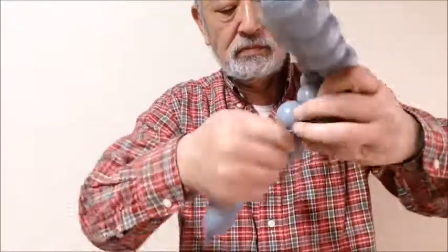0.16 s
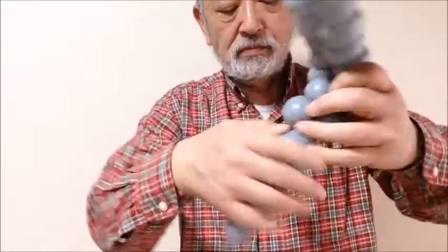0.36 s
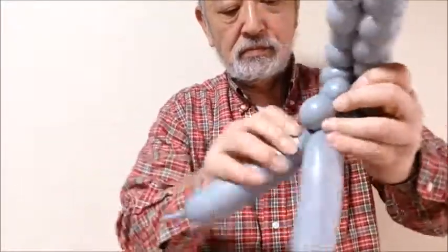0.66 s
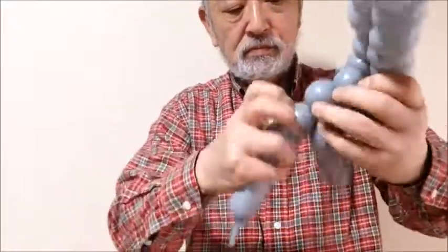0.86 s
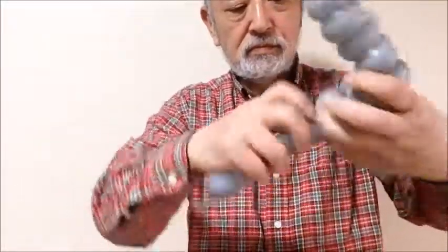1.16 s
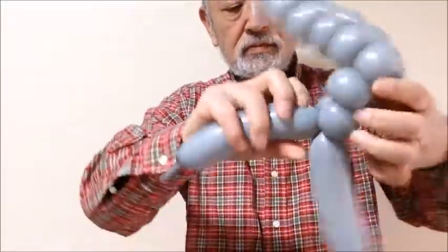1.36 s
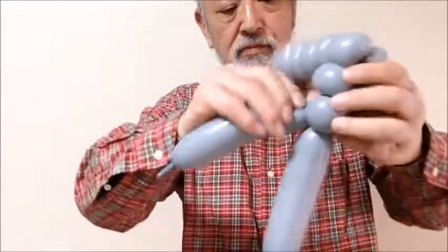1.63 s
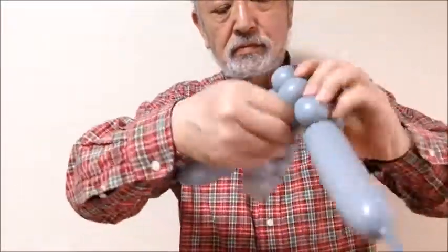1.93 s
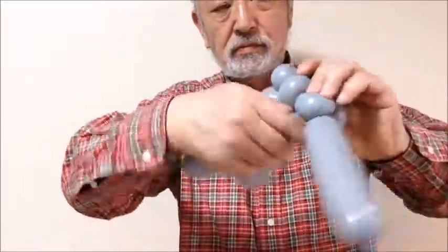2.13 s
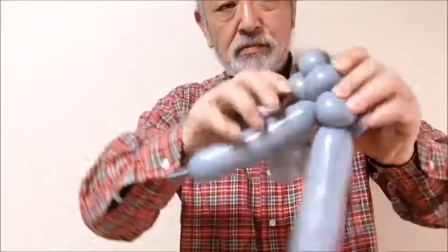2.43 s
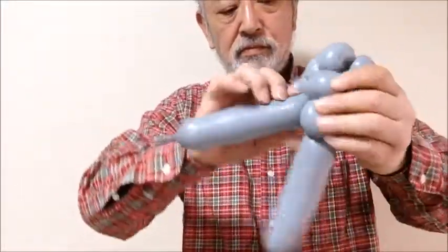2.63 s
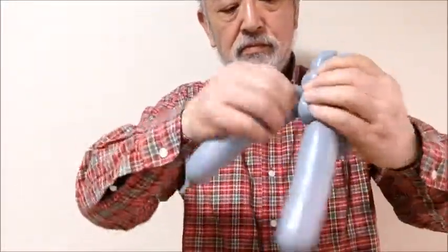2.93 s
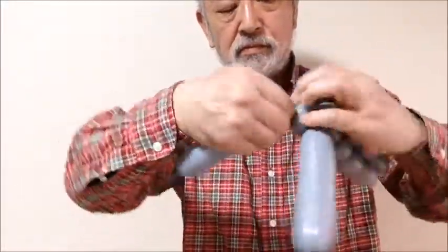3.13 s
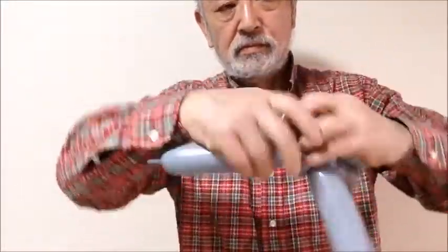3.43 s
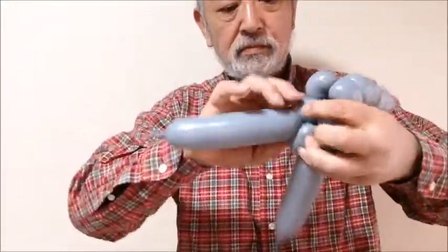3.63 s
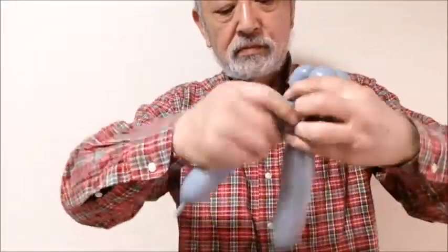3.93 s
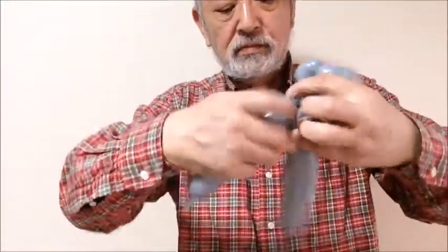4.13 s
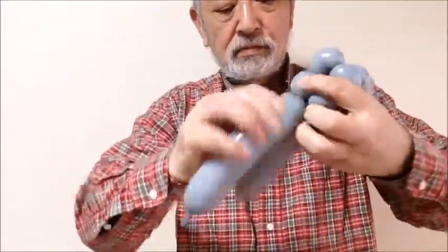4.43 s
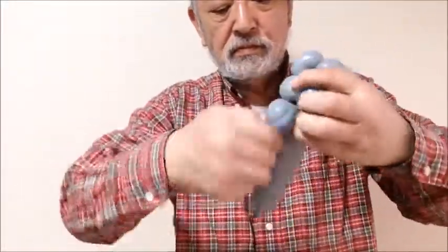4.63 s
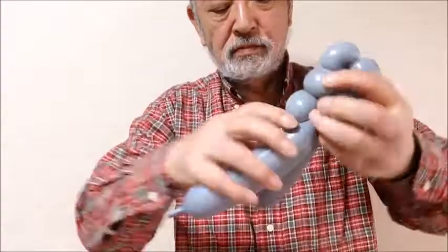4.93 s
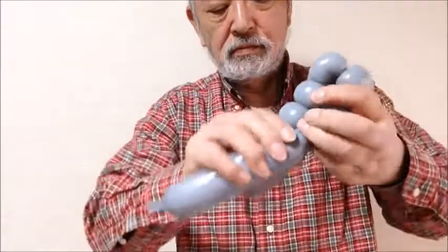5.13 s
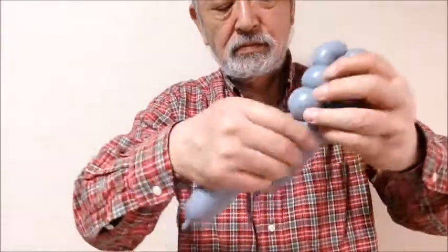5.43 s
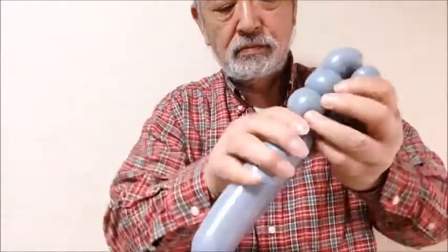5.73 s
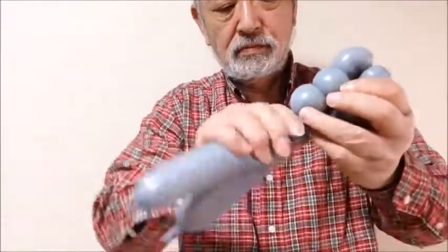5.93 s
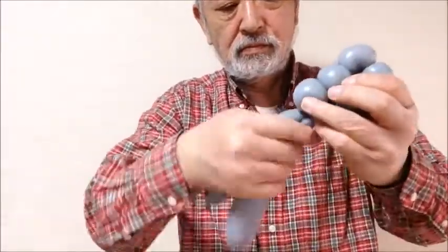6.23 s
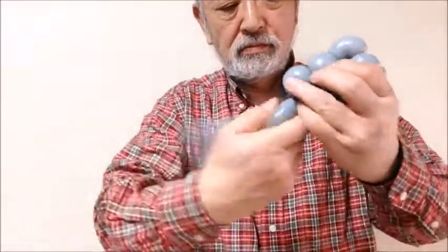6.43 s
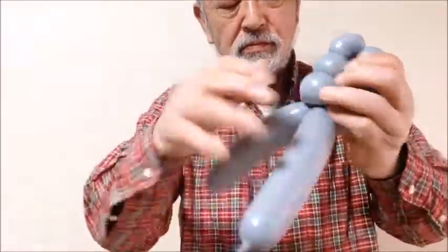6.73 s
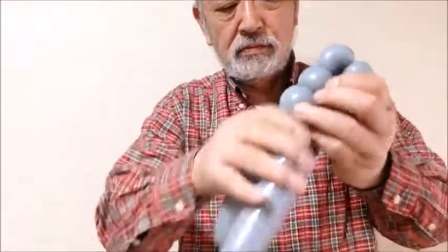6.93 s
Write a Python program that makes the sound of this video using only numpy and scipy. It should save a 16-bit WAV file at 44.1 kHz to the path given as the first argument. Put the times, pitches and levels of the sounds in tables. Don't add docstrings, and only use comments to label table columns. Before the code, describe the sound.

Rubber skins grip and release under moving hands, heard very near. Dry pops and clicks arrive in irregular clusters, densest around one to two seconds, with another busy patch around three to four. Between them are rustling friction, low rubbery groans, quick creaks and tiny chirps. Balloon tubes thud softly. The end is sparser and quieter, with a short small-room reflection and thin, bass-light phone sound.

```python
import sys
import numpy as np
from scipy import signal
from scipy.fft import rfft, irfft
from scipy.io import wavfile
from scipy.ndimage import uniform_filter1d

SR = 44100
rng = np.random.default_rng(int(sys.argv[2]) if len(sys.argv) > 2 else 0)


def boost_factor(decibels):
    exponent = np.asarray(decibels, float) / 20
    return 10 ** exponent


def int16_out(signal):
    q = np.round(np.clip(np.atleast_2d(signal).T, -1, 1) * 32767)
    wavfile.write(sys.argv[1], SR, q.astype(np.int16))


N = 311787


def snaps():
    # start_s, peak_db, ring_hz (skin), rasp_db (slipping after, re peak)
    cracks = [(0.2626, -25.5, 2040, -15), (0.4696, -31.5, 1540, -36), (.5954, -47, 2800, -38),
              (1.7301, -33.5, 945, -9.5), (1.986, -34.5, 2560, -32), (2.0416, -31.5, 1524, -12),
              (2.079, -29.5, 2080, -17), (2.191, -34.5, 2020, -13.5), (2.2356, -34, 1850, -13),
              (2.6924, -38.5, 3350, -13.5), (3.149, -38, 930, -7), (3.2626, -32, 2350, -9),
              (3.6892, -41.5, 2300, -15), (3.991, -35.5, 3220, -7), (4.488, -35, 2110, -14),
              (5.474, -42, 1580, -12), (5.499, -30.5, 1490, -35), (6.846, -47, 3000, -31),
              (7.0171, -41, 2440, -14)]
    pings = [(0.0884, -13, 2000, -23), (0.1165, -14, 2000, -23), (0.1415, -29, 1690, -14),
             (0.2279, -19, 1970, -35), (1.0757, -18.5, 1480, -26), (1.8498, -32, 2300, -11),
             (1.94, -31, 1470, -32), (2.1037, -32, 1970, -9), (2.1684, -22, 1980, -37),
             (2.882, -25, 3300, -19), (2.8957, -24.5, 1520, -14.5), (2.9288, -26.5, 1600, -28),
             (2.9445, -16.5, 3430, -16), (3.925, -30.5, 2840, -12.5), (4.7209, -31, 2310, -24),
             (5.104, -31.5, 2530, -19), (5.492, -26.5, 2320, -17), (5.5234, -24, 2670, -21),
             (5.707, -43, 1220, -5), (6.125, -38, 2560, -13), (6.3446, -27, 2450, -20),
             (6.7652, -54.5, 1120, -5), (7.005, -43, 2790, -23)]
    pops = [(1.0985, -12.5, 1600, -18), (1.6765, -32, 2000, -14), (1.695, -28, 1900, -16),
            (1.109, -22, 2300, -20), (1.13, -23, 2500, -20), (5.034, -36, 1900, -25),
            (5.043, -40, 1900, -20), (6.535, -42, 1500, -25), (6.672, -40, 1100, -12),
            (0.4511, -21.5, 2850, -26), (0.519, -49, 890, -8), (0.6809, -35.5, 1190, -23),
            (1.065, -27.5, 1540, -6.5), (1.153, -24.5, 2330, -13.5), (1.715, -24, 1570, -18.5),
            (1.7494, -22.5, 2520, -16), (1.779, -22, 1490, -22), (1.8074, -13, 2700, -22),
            (2.5764, -35.5, 1880, -14), (2.8612, -30, 1520, -18.5), (2.9764, -31, 2160, -10),
            (3.1161, -29.5, 1940, -24), (3.1731, -21.5, 2150, -15.5), (3.388, -25, 2720, -17.5),
            (3.4282, -27, 1550, -22), (4.0324, -15.5, 1610, -20), (4.181, -33, 1090, -14),
            (4.196, -35, 2000, -18), (4.6273, -26.5, 1740, -14.5), (5.3324, -23, 1670, -21),
            (6.098, -31, 1160, -46), (6.28, -23.5, 1800, -20.5), (6.5626, -30.5, 2590, -8),
            (6.9468, -44.5, 2380, -16), (7.0237, -21, 1900, -19)]
    flicks = [(0.33, -28.5, 1660, -20), (0.9816, -32.5, 1900, -7.5), (1.351, -26, 2930, -25),
              (1.439, -44.5, 826, -4.5), (1.6384, -39, 1840, -39.5), (1.6576, -35.5, 1700, -11),
              (3.546, -35.5, 2070, -11), (3.7821, -30, 3540, -20.5), (3.947, -29.5, 1900, -14),
              (4.0567, -26.5, 1200, -29), (4.2366, -23, 1660, -13.5), (4.863, -42.5, 1140, -8),
              (6.5738, -32, 1150, -13)]
    thuds = [(0.07, -43.5, 1200, -3), (0.1562, -19.5, 2200, -30), (.2715, -28, 2030, -27),
             (.305, -26, 2200, -46), (1.163, -35, 1980, -24), (3.474, -35, 1250, -15),
             (0.7108, -25, 1620, -16), (.999, -25.5, 3500, -20), (1.1175, -15.5, 2340, -15),
             (1.239, -34.5, 880, -8), (1.255, -21.5, 2680, -19), (1.79, -18.5, 1650, -15),
             (1.8227, -15, 1670, -25.5), (1.842, -17, 2050, -29), (1.8817, -21.5, 1830, -15.5),
             (2.3784, -38.5, 1320, -40), (4.317, -28.5, 2570, -11.5), (4.416, -48.5, 2640, -4.5),
             (4.5232, -29.5, 1580, -13), (5.031, -45, 1360, -12), (5.1383, -38, 910, -11),
             (5.179, -31.5, 1540, -16.5), (5.574, -28, 2580, -19), (5.586, -25.5, 1260, -14.5),
             (6.018, -27, 1250, -11), (6.2033, -47.5, 845, -7), (6.262, -38.5, 1500, -14),
             (6.3998, -42.5, 1380, -8.5), (6.5864, -23, 1660, -39), (6.9282, -53, 965, -10)]
    # upper_db (upper ring, re peak), crack_db (re peak)
    kind_colours = [(12, 13), (7, -1.5), (0, -4), (-27, 4.5), (-7, -49)]
    every = []
    for rows, colours in zip([cracks, pings, pops, flicks, thuds], kind_colours):
        every += [(s, db, hz, *colours, rasp_db) for s, db, hz, rasp_db in rows]
    return sorted(every)


def snap(db, hz, upper_db, crack_db, noise, ring_db=0):
    t = np.arange(len(noise)) / SR
    cycles = hz * t
    onset = 1 - np.exp(-t / .0002)
    ring = np.sin(2 * np.pi * cycles) * boost_factor(1.5 - 1.5 * cycles - .45 * cycles ** 2) * onset
    kick = noise * boost_factor(-60 * t / .011) + 6.5 * np.exp(-t * SR)
    low = boost_factor(-3) * peaked(band(kick, 600, 3200))
    upper = boost_factor(upper_db) * peaked(band(kick, 3300, 6200))
    crack = boost_factor(crack_db) * peaked(band(kick, 5800, 13000))
    return boost_factor(db + 1.5) * (boost_factor(ring_db) * ring + low + upper + crack)


def add_snaps(mix):
    for s, db, hz, upper_db, crack_db, _ in snaps():
        add(mix, s, snap(db, hz, upper_db, crack_db, rng.standard_normal(800)))


def rub():
    # peak_s, rise_s, fall_s, level_db
    slides = [(.02, 0.38, 0.83, -50), (.29, 0.099, 0.081, -30.5), (.78, 0.051, 0.11, -33.5),
              (1.055, 0.036, .1, -33), (1.35, 0.26, 0.1, -38.5), (1.82, 0.29, 0.6, -35),
              (2.07, 0.085, 0.43, -35.5), (2.22, .1, .15, -45), (2.31, 0.56, 0.1, -39.5),
              (2.6, 0.42, 0.46, -49.5), (2.92, 0.15, 0.4, -31.5), (3.05, 0.28, 0.59, -48),
              (3.19, 0.079, 0.21, -31), (3.6, 0.19, .5, -44), (3.85, 0.074, 0.09, -40),
              (3.98, 0.12, .1, -34.5), (4.29, 0.094, 0.13, -33), (4.53, 0.11, 0.18, -37),
              (5.35, 0.084, 0.049, -42), (5.47, 0.1, .3, -45.5), (7.03, 0.026, 0.058, -34)]
    grips = [(.135, 0.027, .07, -41), (.469, 0.12, 0.58, -42.5), (1.12, 0.13, 0.078, -25),
             (1.7, 0.075, 0.69, -31.5), (3.281, 0.43, 0.027, -27.5), (3.46, 0.17, 0.032, -31.5),
             (4.06, 0.15, 0.15, -25.5), (4.9, 0.26, 0.099, -40), (5.17, 0.41, 0.061, -45.5),
             (5.7, 0.29, 0.37, -41.5), (6.03, 0.16, 0.061, -36.5), (6.14, 0.13, 0.23, -48),
             (6.29, 0.047, 0.51, -45), (6.59, 0.093, 0.093, -35.5), (6.675, .015, 0.19, -61)]
    groans = [(.469, 0.17, 0.05, -37), (.72, 0.056, 0.46, -39), (1.03, 0.053, 0.067, -30),
              (1.35, 0.3, 0.072, -32), (1.82, 0.27, 0.08, -32), (2.31, 0.5, 0.2, -40),
              (2.59, 0.19, 0.16, -41), (2.92, 0.16, 0.059, -32), (3.22, 0.57, 0.06, -35),
              (3.49, 0.13, 0.65, -42), (3.85, 0.11, 0.062, -40.5), (4.26, 0.034, 0.35, -36.5),
              (4.9, 0.98, 0.75, -43), (5.26, 1, 1, -45.5), (5.75, 0.53, 0.33, -41),
              (6.03, 0.034, 0.034, -31), (6.14, 0.067, 0.052, -30.5), (6.29, 0.071, 0.39, -43.5),
              (6.59, 0.058, 0.16, -38.5), (7.05, 0.22, 0.078, -47.5)]
    # centre_hz, width_hz, level_db
    skin_modes = [(950, 450, -7), (1400, 450, -2.5), (2000, 700, -2.5), (3000, 1500, -8)]
    # centre_hz, width_hz, level_db
    tube_modes = [(190, 22, -7), (348, 130, -10.5), (446, 61, 4), (860, 1090, -5.5)]
    # freq_hz, level_db (per Hz)
    hiss_colour = [(1800, -14), (3000, -3), (4500, -0.5), (8000, -4.5), (15500, -14)]

    slide_db, grip_db, tube_db = strokes(slides), strokes(grips), strokes(groans)
    skin_db = np.maximum(slide_db, grip_db)
    hiss_db = np.maximum(slide_db + 1.5, grip_db - 4.5)

    snap_s, peak_db, ring_hz, upper_db, _, rasp_db = np.transpose(snaps())
    now_s = np.arange(N) / SR
    following = np.searchsorted(snap_s, now_s)
    wait_s = np.append(snap_s, N)[following] - now_s
    stuck = 1 - .95 * np.exp(-wait_s / .014)
    after_db = peak_db + rasp_db
    skin = np.sqrt(stuck * boost_factor(2 * skin_db - 16.5) + unrest(after_db + 6, .1))
    hiss = np.sqrt(stuck * boost_factor(2 * hiss_db - 21.5) + unrest(after_db + .5 * upper_db + 1, .15))
    tube = np.sqrt(boost_factor(2 * tube_db - 21.5) + boost_factor(-30) * skin ** 2)

    grip = boost_factor(2.5 * evened(uniform_filter1d(rng.standard_normal(N), 400)))
    drive = evened(grip * (evened(slips(700, 3.6)) + .9 * rng.standard_normal(N)))
    slow = evened(slips(250, 4.5)) + .6 * drive
    patch_hz = ring_hz[np.clip(following - 1, 0, None)]
    skin_ring = evened(body(drive, skin_modes) + .45 * resonate(drive, patch_hz, 750))
    breath = colour(drive + grip * rng.standard_normal(N) / 2, hiss_colour)
    return skin * skin_ring - hiss * breath + tube * body(slow, tube_modes)


def strokes(rows):
    t, level_db = np.arange(0, N + 64, 64) / SR, -np.inf
    for s, rise, fall, db in rows:
        away = np.where(t < s, (s - t) / abs(rise), (t - s) / abs(fall))
        level_db = np.maximum(level_db, db - 20 * away)
    return np.interp(np.arange(N) / SR, t, level_db)


def slips(per_s, spread_db):
    size = boost_factor(spread_db * np.minimum(rng.exponential(1, N), 3.1))
    return (rng.random(N) < per_s / SR) * size * rng.choice([-1, 1], N)


def unrest(start_db, t60):
    kicks = np.zeros(N)
    starts = np.round((np.transpose(snaps())[0] + .002) * SR).astype(int)
    np.add.at(kicks, starts, boost_factor(2 * start_db))
    return signal.lfilter([1], [1, -boost_factor(-2 * 60 / (t60 * SR))], kicks)


def add_creaks(mix):
    # start_s, first_gap_s, gap_growth (ratio), peak_db, ring_hz (skin)
    creak_runs = [
        (.7645, .003, 1.4, -29, 1900),
        (5.936, .0215, .98, -36, 950),
        (6.399, .0145, 1.12, -38, 1600),
    ]
    for s, gap, growth, db, hz in creak_runs:
        gaps = gap * growth ** np.arange(5)
        starts = s + np.cumsum(gaps) - gaps
        for at in np.concatenate([starts, starts[2:] + .3 * gaps[2:]]):
            noise = rng.standard_normal(600)
            patch_hz = hz * boost_factor(1.5 * noise[-1])
            add(mix, at, snap(db, patch_hz, -2, -8, noise, -9))


def squeak(length, first_hz, last_hz, db, slope_db):
    size, orders = round(length * SR), np.arange(1, 13)[:, None]
    wobble = uniform_filter1d(rng.standard_normal((13, size)), 90)
    hz = np.geomspace(first_hz, last_hz, size) * (1 + first_hz / 3000 * wobble[0])
    tilt_db = slope_db * np.log2(orders) - 7 * (orders * hz / 2300) ** 2 + 25 * wobble[1:]
    cycles = orders * np.cumsum(hz) / SR + .77 * rng.random(orders.shape)
    stack = boost_factor(tilt_db) * np.cos(2 * np.pi * cycles)
    return boost_factor(db) * evened(stack.sum(0)) * signal.windows.tukey(size, .6)


def add_squeaks(mix):
    # start_s, length_s, first_hz, last_hz, level_db
    bright = [
        (.775, .042, 420, 408, -47),
        (2.121, .026, 1000, 1000, -37),
        (2.292, .034, 347, 343, -34),
        (3.437, .0075, 980, 1150, -24),
        (3.445, .036, 2050, 2450, -37),
        (3.439, .045, 4200, 4450, -39),
        (5.66, .027, 1550, 600, -34),
    ]
    round_hums = [
        (.73, .016, 700, 430, -43),
        (1.835, .035, 210, 205, -42),
        (3.12, .105, 478, 466, -45),
        (4.254, .07, 285, 265, -51),
        (5.587, .016, 1230, 1170, -36),
        (6.016, .014, 720, 680, -36),
        (6.129, .012, 1250, 1100, -39),
        (6.585, .02, 1500, 1300, -35),
    ]
    for rows, slope_db in (bright, 6), (round_hums, -11):  # overtones, dB per octave
        for s, *row in rows:
            add(mix, s, squeak(*row, slope_db))


def add_knocks(mix):
    # start_s, peak_db, tube_hz
    tube_knocks = [(0.261, -46, 384), (.426, -48, 444), (0.448, -50.5, 308), (0.564, -41.5, 376),
                   (0.656, -41.5, 454), (.68, -42, 297), (0.751, -49, 247), (0.988, -37, 416),
                   (1.239, -36, 447), (1.336, -31.5, 412), (1.436, -39, 170), (1.621, -41, 430),
                   (2.379, -41.5, 203), (2.573, -35, 476), (2.584, -43, 164), (2.599, -37, 450),
                   (2.948, -38.5, 452), (2.959, -48, 170), (3.469, -40.5, 386), (3.644, -40, 570),
                   (4.03, -45, 555), (4.244, -29.5, 469), (4.32, -35.5, 345), (4.338, -36.5, 407),
                   (4.743, -53, 470), (4.914, -40.5, 274), (4.939, -46, 267), (5.068, -40, 267),
                   (5.166, -37.5, 394), (5.758, -39.5, 460), (6.031, -46, 434), (6.101, -42, 426),
                   (6.14, -50, 437), (6.203, -49, 412), (6.576, -32, 422), (6.584, -35, 186)]
    t = np.arange(3500) / SR
    for s, db, hz in tube_knocks:
        puff = band(rng.standard_normal(len(t)), 161, 656)
        boom = np.sin(2 * np.pi * hz * t * (1 - 2.8 * t)) + .64 * puff
        add(mix, s, boost_factor(db + 2 - 60 * t / .066) * (1 - np.exp(-t / .0023)) * boom)


def add_ticks(mix):
    # start_s, peak_db
    dry_ticks = [(.249, -38), (0.4603, -33), (3.592, -29), (3.646, -37), (3.7276, -32), (4.7138, -26),
                 (4.838, -33), (5.026, -32), (5.8393, -32), (6.131, -45), (6.152, -39)]
    for s, db in dry_ticks:
        add(mix, s, snap(db - 7.5, 2580, 1, -.28, rng.standard_normal(500)))


def add_pricks(mix):
    # start_s, peak_db, lowest_hz
    pinpoints = [(0.0478, -36, 4000), (0.391, -36, 4000), (0.429, -38, 4000), (0.5222, -35, 4000),
                 (1.052, -34, 4000), (1.3264, -30, 4000), (1.6804, -34, 4000), (2.2644, -36, 4000),
                 (2.4804, -34.5, 4000), (2.7132, -34, 4000), (2.728, -37, 4000), (2.7405, -48, 4000),
                 (2.7881, -44, 4000), (2.904, -25, 4000), (2.914, -19, 4000), (3.0844, -31, 4000),
                 (3.3514, -44, 4000), (3.8535, -36, 4000), (4.4523, -39, 4000), (4.4684, -26, 4000),
                 (4.5784, -37, 4000), (4.6877, -35, 4000), (5.4375, -41, 4000), (5.668, -30, 4000),
                 (6.27, -34, 3950), (6.5498, -35, 4000), (6.565, -29, 4000), (6.6323, -48, 4000)]
    decay = boost_factor(-60 * np.arange(400) / SR / .008)
    for s, db, lo_hz in pinpoints:
        spit = band(rng.standard_normal(400) * decay, lo_hz, 15000)
        add(mix, s + .001, boost_factor(db) * peaked(spit))


def room(x):
    # freq_hz, t60_s
    wall_decay = [(200, 0.17), (700, 0.18), (2000, 0.21), (5000, 0.074), (12000, 0.16)]
    taps = np.zeros((3, SR // 2))
    at = np.arange(160, SR // 2 - 20, 20) + rng.integers(0, 20, (3, (SR // 2 - 161) // 20))
    np.put_along_axis(taps, at, rng.choice([-1., 1.], at.shape), 1)
    hz, t, z = signal.stft(taps, SR, nperseg=256)
    tails = signal.istft(z * boost_factor(-60 * t / read(wall_decay, hz)[:, None]), SR, nperseg=256)[1]
    phase = 7 * np.arange(N) / SR + np.arange(3)[:, None] / 3
    turn = np.cos(2 * np.pi * phase) * np.sqrt(2 / 3)
    return signal.fftconvolve(x * turn, tails / np.linalg.norm(tails[0]), axes=1)[:, :N].sum(0)


def still_air():
    # freq_hz, level_db (per Hz)
    air_colour = [(30, -38), (150, -2.5), (450, -1.5), (1000, -18), (3000, -12), (8000, -11.5),
                  (15500, -12.5)]
    return boost_factor(-60.5) * colour(rng.standard_normal(N), air_colour)


def evened(x):
    return x / np.sqrt(np.mean(x ** 2) + 1e-20)


def peaked(x):
    return x / abs(x).max()


def add(mix, s, sound):
    part = mix[round(s * SR):][:len(sound)]
    part += sound[:len(part)]


def read(points, hz):
    f, value = np.transpose(points)
    return np.interp(np.log(hz + 1), np.log(f + 1), value)


def colour(x, points):
    gain = boost_factor(read(points, np.fft.rfftfreq(len(x), 1 / SR)))
    return evened(irfft(rfft(x) * gain, len(x)))


def band(x, lo_hz, hi_hz):
    return evened(signal.lfilter(*signal.butter(2, [lo_hz, hi_hz], "band", fs=SR), x))


def body(x, modes):
    total = 0
    for k, (hz, width, db) in enumerate(modes):
        total = total + (-1) ** k * boost_factor(db) * signal.lfilter(*signal.iirpeak(hz, hz / width, SR), x)
    return evened(total)


def resonate(x, hz, width):
    turn, r = np.exp(2j * np.pi * np.cumsum(hz) / SR), np.exp(-np.pi * width / SR)
    return evened((turn * signal.lfilter([1 - r], [1, -r], x / turn)).real)


def scene():
    near = np.zeros(N)
    add_snaps(near)
    add_creaks(near)
    add_squeaks(near)
    add_knocks(near)
    add_ticks(near)
    add_pricks(near)
    near = near + rub()
    return (near + boost_factor(-7.5) * room(near) + still_air())[None]


def low_pass(x):
    return signal.sosfilt(signal.butter(12, 16500, fs=SR, output="sos"), x)


def record(dry):
    thin = signal.sosfilt(signal.butter(4, 140, "high", fs=SR, output="sos"), dry)
    level_db = 10 * np.log10(uniform_filter1d(thin ** 2, 1500) + 1e-12)
    thin = thin * boost_factor(-3 * np.clip((-57 - level_db) / 6, 0, 1))
    rumble = boost_factor(-101) * band(rng.standard_normal(N), 20, 90)
    bent = thin + .06 * thin ** 2 + rumble
    edge = signal.firwin(255, 15300, window=("kaiser", 3.3), fs=SR)[None]
    return low_pass(signal.oaconvolve(bent, edge, "same"))


dry = scene()
out = record(dry)
int16_out(out)
```